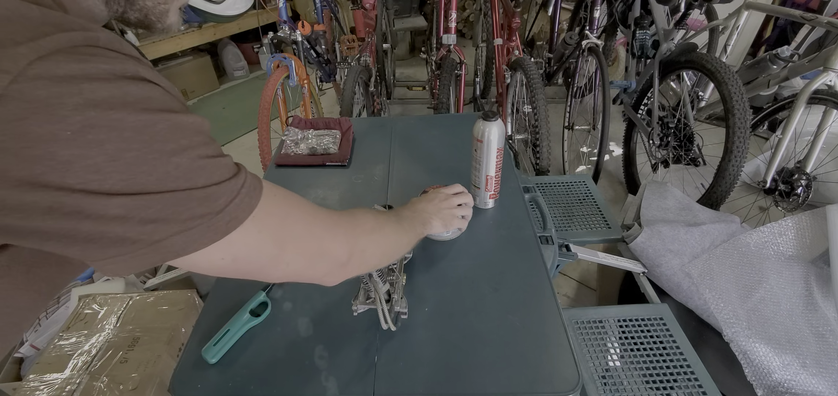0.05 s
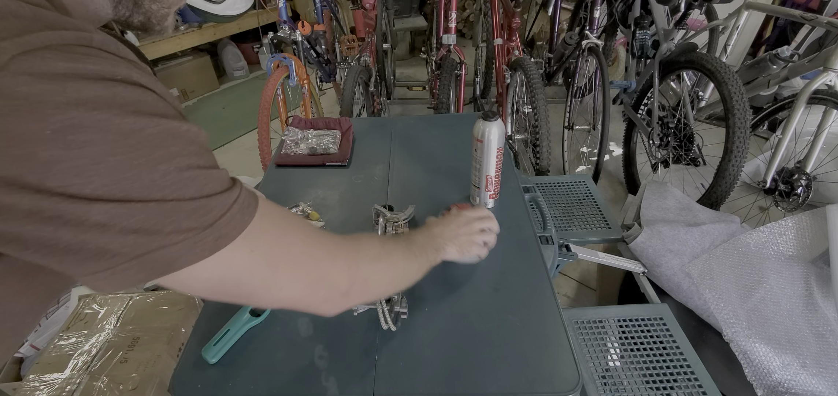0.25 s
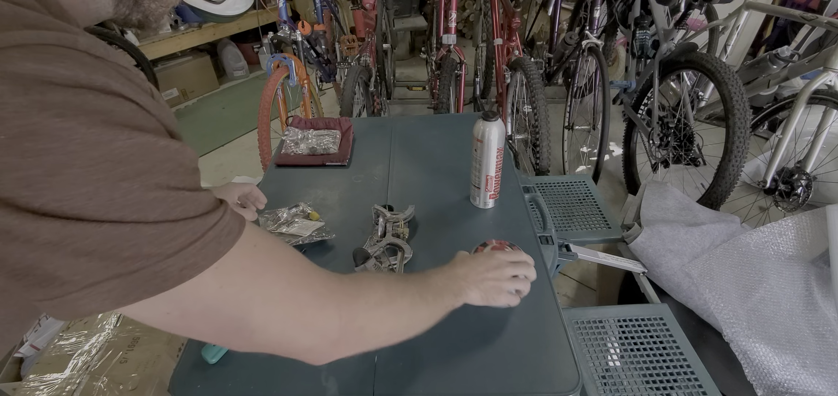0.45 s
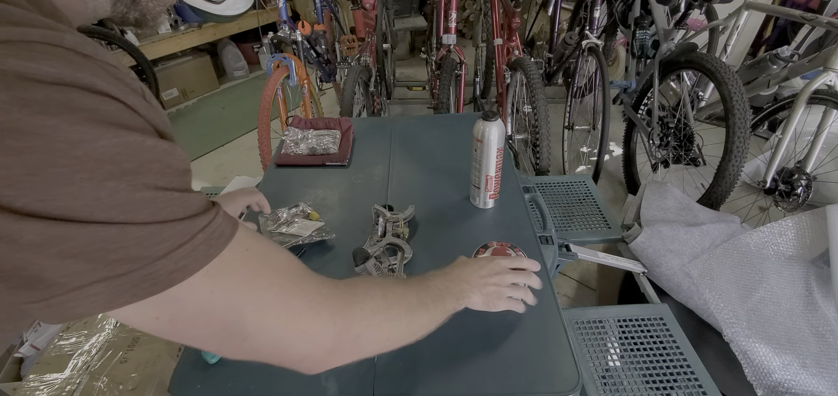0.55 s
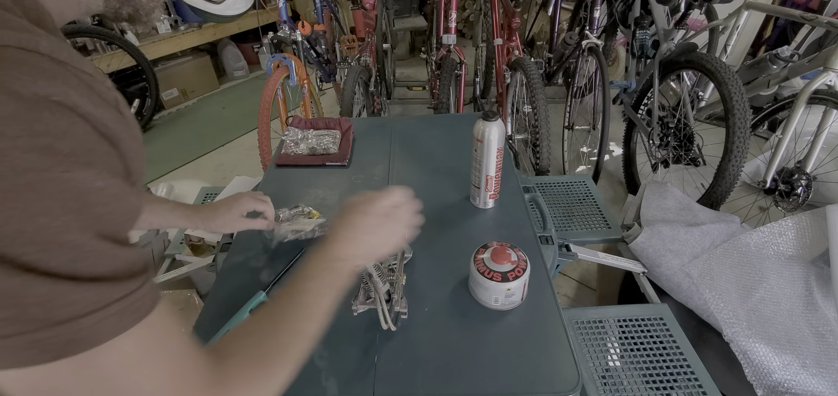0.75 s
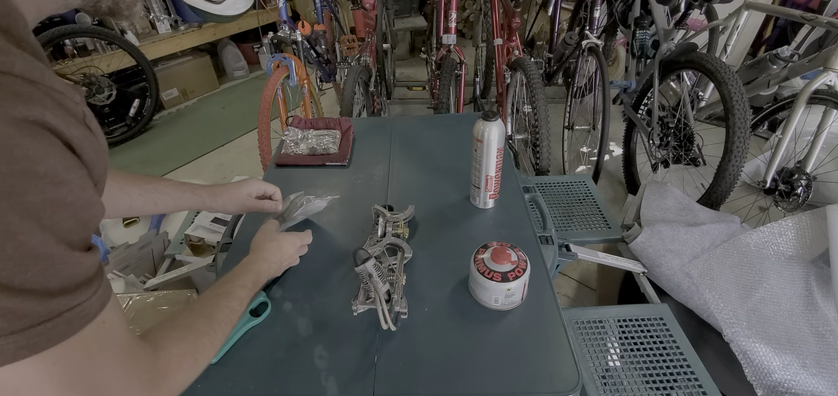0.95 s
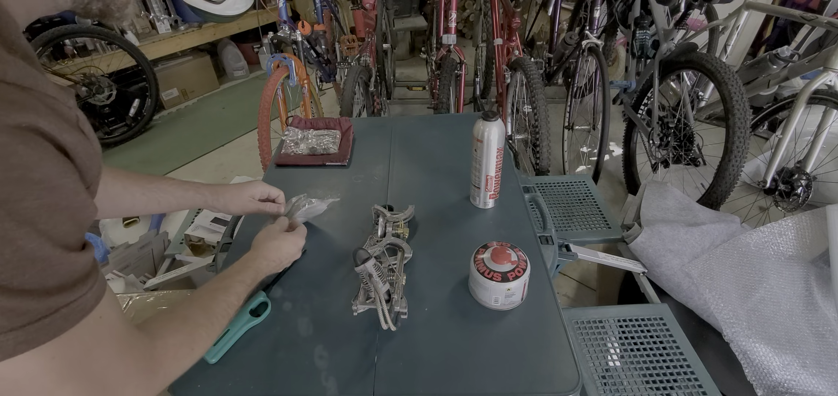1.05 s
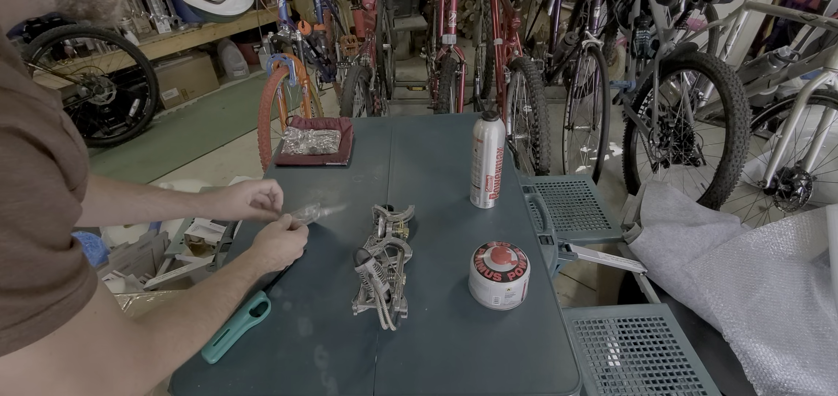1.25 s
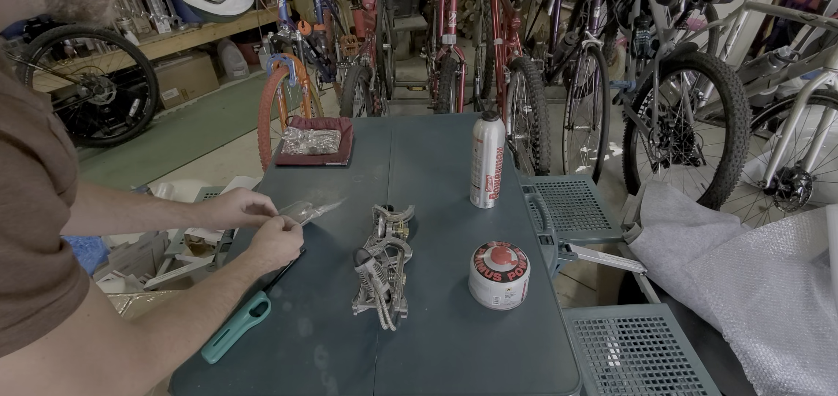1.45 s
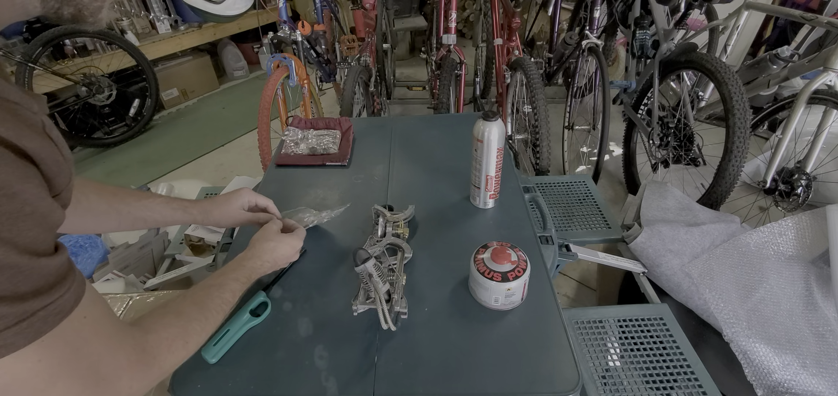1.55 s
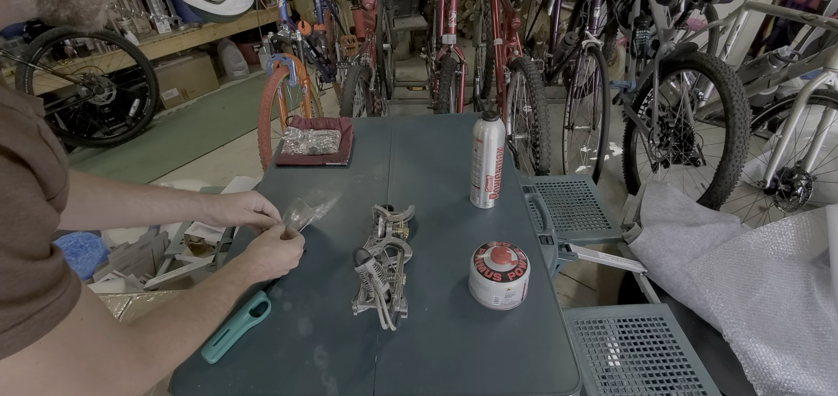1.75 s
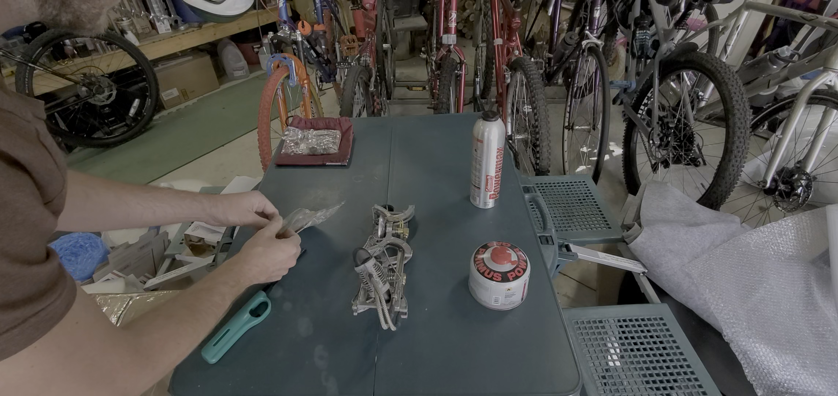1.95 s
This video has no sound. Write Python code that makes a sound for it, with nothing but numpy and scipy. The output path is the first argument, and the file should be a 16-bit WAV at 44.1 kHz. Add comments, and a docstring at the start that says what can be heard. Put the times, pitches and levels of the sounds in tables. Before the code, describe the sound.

A steel canister scrapes across a plastic table from about 0.1 to 0.6 seconds, rasping and catching while the top drones, loudest near 0.35. A dry tick sounds on the right at 0.7, and a hand rubs dully over the table around 0.9 to 1.1. From 0.7 to 2 seconds a small plastic bag crackles quietly, with a thin squeak near 1.3. A low workshop hum lies underneath.

```python
"""A workshop with a low hum, heard from a stereo microphone close to a plastic folding table.
First a steel fuel canister is pushed across it: the rim slips, rasps and catches, and the top drones.
Then a dry tick sounds on the right, and a hand rubs dully over the table and picks at a small
plastic bag, whose film crackles as it buckles and gives one longer squeak as it slides on itself."""
import sys
import numpy as np
from scipy import signal
from scipy.fft import rfft, irfft
from scipy.io import wavfile

SR = 44100
rng = np.random.default_rng(int(sys.argv[2]) if len(sys.argv) > 2 else 0)


def generate_wav(signal):
    """Clip the signal to [-1, 1] and save it as 16-bit WAV at the path in sys.argv[1]."""
    frames = np.transpose(np.atleast_2d(signal))
    scaled = np.clip(frames, -1, 1) * 32767
    pcm = np.round(scaled).astype(np.int16)
    wavfile.write(sys.argv[1], SR, pcm)


N = 88200
T = np.arange(N) / SR
BIN_HZ = np.arange(N + 1) * SR / (2 * N)

# modes of the plastic table top: pitch_hz, relative_db, t60_s
TABLE_MODES = [(109.8,-9.5,0.17),(138,-11.5,0.44),(167,-7.5,0.25),(215.5,-5.5,0.23),(255.4,-8.5,0.21),(341,0.5,0.26),(385,-2.5,0.19),(436.2,2,0.19),(486.5,2.5,0.13),(571.4,-5,0.3),(621,-4.5,0.17),(711.7,-1.5,0.31),(786,-8,.13),(998,-3.5,0.17)]


def from_db(db):
    """Decibels to gain."""
    return 10 ** (np.asarray(db) / 20)


def rms_one(x):
    """Scale to unit power."""
    return x / np.sqrt(np.mean(x ** 2) + 1e-20)


def in_time(rows):
    """Each column of a curve at every sample."""
    times, *columns = np.transpose(rows)
    return [np.interp(T, times, column) for column in columns]


def at_hz(points, hz):
    """Read a spectrum on a log-frequency axis."""
    frequencies, values = np.transpose(points)
    return np.interp(np.log(hz + 1e-3), np.log(frequencies), values)


def low_pass(x, hz, order=2):
    """Butterworth low-pass."""
    return signal.sosfilt(signal.butter(order, hz, fs=SR, output="sos"), x)


def colour(x, spectrum):
    """Causal filter of unit power gain with the given spectrum."""
    gain = rms_one(from_db(at_hz(spectrum, BIN_HZ)))
    cepstrum = irfft(np.log(gain))
    cepstrum[1:N] *= 2  # fold to minimum phase
    cepstrum[N + 1:] = 0
    return irfft(rfft(x, 2 * N) * np.exp(rfft(cepstrum)))[..., :N]


def spread(pair, left_lag_s=0):
    """Two unrelated signals become the microphone's left and right, alike in the bass."""
    # likeness of the two sides: frequency_hz, correlation
    likeness = [(60,.98),(140,.99),(290,.96),(500,.9),(1000,.8),(2000,.5),(5000,.28),(14000,.2)]
    alike = at_hz(likeness, BIN_HZ)
    mid, side = rfft(pair, 2 * N) * np.sqrt([1 + alike, 1 - alike]) / np.sqrt(2)
    delay = np.exp(-2j * np.pi * BIN_HZ * left_lag_s)
    return irfft([(mid + side) * delay, mid - side])[:, :N]


def panned(db):
    """Left and right gains; positive is to the left."""
    return from_db(np.array([[db], [-db]]) / 2)


def balanced(x, points):
    """A left-right balance that changes with frequency."""
    db = at_hz(points, BIN_HZ)
    return irfft(rfft(x, 2 * N) * from_db(np.array([db, -db]) / 2))[:, :N]


def noise():
    """Two unrelated white noises."""
    return rng.standard_normal((2, N))


def grains(per_s, spread_db):
    """Random clicks of uneven size, with separate strengths on two paths."""
    sizes = from_db(spread_db * np.minimum(rng.exponential(1, N), 4))
    return rms_one((rng.random(N) < per_s / SR) * sizes * noise())


def decay(start_s, fade_s):
    """A sudden start that dies away."""
    return (T >= start_s) * np.exp(-np.maximum(T - start_s, 0) / fade_s)


def resonance(x, hz, width_hz):
    """A resonance that keeps the power of white noise."""
    radius = np.exp(-np.pi * width_hz / SR)
    forward = np.sqrt((1 - radius ** 2) / 2) * np.array([1, 0, -1])
    feedback = [1, -2 * radius * np.cos(2 * np.pi * hz / SR), radius ** 2]
    return signal.lfilter(forward, feedback, x + 1e-18)


def body(force, modes):
    """A body's modes ring under a force."""
    hz, db, t60_s = np.transpose(modes)
    gains = from_db(db) / np.linalg.norm(from_db(db))
    widths_hz = np.log(1000) / (np.pi * t60_s)
    return sum(gain * resonance(force, pitch, width) for pitch, gain, width in zip(hz, gains, widths_hz))


def wavering(width_hz):
    """Slowly wandering complex amplitudes of a narrow line."""
    wander = low_pass(noise() + 1j * noise(), width_hz)
    return rms_one(wander.view(float)).view(complex)


def friction_tone(curve, width_hz, octave_db):
    """A rough, gliding stick-slip tone and its octave."""
    hz, db = in_time(curve)
    turn = np.exp(2j * np.pi * np.cumsum(hz) / SR)
    tone = wavering(width_hz) * turn + from_db(octave_db) * wavering(2 * width_hz) * turn ** 2
    return tone.real * from_db(db) * (T > curve[0][0]) * (T < curve[-1][0])


def room_hum():
    """A wavering hum over dull room tone, all around the microphone."""
    # lines of the hum: pitch_hz, width_hz, level_db
    lines = [(64.5,13,-53),(135.3,11,-57),(1285,10,-70.5)]
    # swell of all the lines together: time_s, gain_db
    swell = [(0,-7),(.25,8),(.55,-4),(.64,5),(.8,-3),(1.1,-0.5),(1.25,4.5),(1.33,9.5),(1.48,3),(1.7,2.5),(2,-3.5)]
    # spectrum of the room tone: frequency_hz, relative_db
    room_spectrum = [(25,-15),(45,0.5),(65,-6.5),(100,-3.5),(140,-7.5),(220,-14.5),(400,-20),(1200,-23),(3000,-33),(8000,-46.5),(16000,-39)]
    steady_share = .35
    hum = 0
    for hz, width_hz, db in lines:
        amplitude = np.sqrt(2 * steady_share) + np.sqrt(1 - steady_share) * wavering(width_hz)
        turn = np.exp(2j * np.pi * (hz * T + rng.random((2, 1))))
        hum += from_db(db) * (amplitude * turn).real
    room_tone = from_db(-52.5) * colour(noise(), room_spectrum)
    return spread(hum * from_db(in_time(swell)[0]) + room_tone)


def workshop_reverb(x, t60_s=.26, gap_s=.005):
    """The short, dull reverberation of a cluttered room."""
    tail = low_pass(noise() * from_db(-60 * T / t60_s) * (T > gap_s), hz=7560)
    return spread(signal.fftconvolve(x, rms_one(tail) / np.sqrt(N), axes=1)[:, :N])


def tick():
    """A single dry pulse with a bright edge, close to the microphone's right side."""
    pulse = decay(start_s=.6912, fade_s=.00056)
    edge = from_db(-8) * resonance(pulse, hz=4080, width_hz=700)
    return from_db(-29) * panned(db=-22.5) * low_pass(pulse + edge, hz=4920, order=8)


def table_boom(bottom_hz=100, top_hz=280):
    """The lowest modes of the table swell as weight shifts on it."""
    # swell of the boom: time_s, level_db
    swell = [(0,-89),(.1,-55),(.18,-39),(.308,-43),(.322,-28),(.37,-36),(.44,-38),(.475,-30.5),(.52,-36.5),(.6,-48),(.66,-54),(.71,-50),(.78,-61.5),(.87,-45),(.93,-38.5),(1.0,-49.5),(1.08,-46.5),(1.16,-52.5),(1.3,-62),(2,-62)]
    low_modes = [mode for mode in TABLE_MODES if mode[0] < top_hz]
    sway = rms_one(resonance(noise(), hz=144.6, width_hz=32))
    boom = sway + from_db(3) * rms_one(body(noise(), low_modes))
    band = signal.butter(3, [bottom_hz, top_hz], "band", fs=SR, output="sos")
    return spread(rms_one(signal.sosfilt(band, boom)) * from_db(in_time(swell)[0]))


def hand_bumps(pitch_hz=377.5, fade_s=.018, rise_s=.0031):
    """The soft hand lands on the table, each time with a brief, dull note."""
    # landings of the hand: start_s, level_db
    bumps = [(.106,-34.5),(1.108,-47.5),(1.454,-48),(1.71,-48.5)]
    out = 0
    for start_s, db in bumps:
        shape = decay(start_s, fade_s) - decay(start_s, rise_s)
        out += 2 * from_db(db) * shape * np.sin(2 * np.pi * pitch_hz * (T - start_s))
    return out


def hand():
    """Skin drags, judders and bumps on the table: soft slips, dull ringing."""
    # strength of the rubbing: time_s, level_db
    rubbing = [(.70,-67),(.80,-70),(.878,-43.5),(.893,-36),(.93,-36.5),(1.005,-33.5),(1.035,-45),(1.07,-51.5),(1.11,-43),(1.15,-63),(1.44,-72),(1.465,-50),(1.50,-56),(1.68,-64),(1.715,-48.5),(1.76,-70)]
    # spectrum of skin on plastic: frequency_hz, relative_db
    rub_spectrum = [(70,-27),(170,7.5),(290,-2),(380,9),(530,-3),(640,-5),(980,-1),(1200,-12),(2500,-22),(6000,-47)]
    # stick-slip of the skin: time_s, pitch_hz, level_db
    judder_curve = [(.83,490.3,-47),(.882,501.4,-47),(.897,503,-32),(.92,558.7,-46.5),(.965,546.2,-39.5),(.99,518.3,-30.5),(1.015,496,-42),(1.05,477,-75)]
    force = grains(per_s=900, spread_db=1) * from_db(in_time(rubbing)[0])
    rub = from_db(-1.5) * colour(force, rub_spectrum)
    ring = from_db(-6.5) * low_pass(body(force, TABLE_MODES), hz=553)
    judder = friction_tone(judder_curve, width_hz=20.7, octave_db=-19)
    return spread(rub + ring + judder) + hand_bumps()


def film_squeak(width_hz=183, chirp_hz=7670, chirp_half_s=.023):
    """Film slides over film in one squeak, and chirps faintly as the fingers shift their grip."""
    # glide of the squeak: time_s, pitch_hz, level_db
    glide = [(1.20,7550,-63),(1.235,7720,-53),(1.26,7300,-54),(1.31,7230,-44),(1.35,7070,-45),(1.41,7100,-53),(1.50,7000,-70)]
    # brief chirps: centre_s, level_db
    chirps = [(.232,-62),(1.078,-69),(1.167,-55)]
    squeak = friction_tone(glide, width_hz, octave_db=-12)
    swell = sum(from_db(db - 14 * ((T - centre_s) / chirp_half_s) ** 2) for centre_s, db in chirps)
    chirp_tone = (wavering(width_hz) * np.exp(2j * np.pi * chirp_hz * T)).real
    return squeak + swell * chirp_tone


def film_snaps(fade_s=.0012, rise_s=.00055, tail_s=.008, ring_q=2.5):
    """Each buckling patch of the bag gives a short crack, coloured by its own pitch."""
    # buckling patches: start_s, relative_db, left_minus_right_db, pitch_hz
    patches = [(0.726,-37,-5,9100),(0.759,-42,-5,6200),(0.7829,-39,-3,11000),(0.784,-38,5,1350),(0.786,-34.5,4,4240),(.818,-27.5,4.5,5430),(0.9008,-34.5,7.5,10600),(0.963,-38,4,7700),(1.0872,-41,-1,7600),(1.098,-55,4,12000),(1.110,-47,-7,13000),(1.13,-35.5,0,11100),(1.1691,-28,-2,13500),(1.173,-40,6,14100),(1.1874,-23,1,11800),(1.2097,-33,11,8160),(1.2218,-32,-1,11500),(1.258,-29.5,5,2900),(1.261,-37.5,-9,7050),(1.309,-38,0,11000),(1.368,-35,2,13600),(1.389,-38.5,15,11500),(1.4759,-31.5,2.5,12400),(1.5433,-42,-2,9100),(1.583,-34.5,6,12100),(1.633,-35,3,2920),(1.672,-33.5,4,4080),(1.687,-33,2,12300),(1.749,-33,3,9900),(1.770,-33.5,10,13900),(1.784,-38,-1,13000),(1.81,-37,1,11900),(1.8333,-27.5,4,10900),(1.851,-44,-9,13000),(1.949,-36.5,2,8800),(1.967,-38,2,12200),(1.977,-30.5,2,13000),(1.985,-31,3,13600)]
    out, crack = 0, noise()
    for start_s, db, pan_db, hz in patches:
        shape = decay(start_s, fade_s) - decay(start_s, rise_s) / 2
        tail = from_db(-18) * decay(start_s, tail_s)
        ring = from_db(-5) * resonance(crack, hz, hz / ring_q)
        out += from_db(db - 1.5) * panned(pan_db) * (shape + tail) * (crack + ring)
    return out


def bag(fade_in_s=.04):
    """Thin plastic near the microphone rustles, buckles in small creases, snaps and squeaks."""
    # strength of the handling: time_s, level_db
    picking = [(.68,-66),(.715,-56),(.735,-60),(.82,-53),(.93,-53.5),(1.0,-59.5),(1.075,-67),(1.095,-53.5),(1.15,-55.5),(1.185,-52.5),(1.3,-55.5),(1.39,-50.5),(1.44,-72),(1.48,-54.5),(1.53,-59),(1.59,-58.5),(1.65,-56),(1.68,-54),(1.735,-58.5),(1.775,-52),(1.84,-52.5),(1.89,-60),(1.942,-69),(1.955,-51),(2,-54.5)]
    # spectrum of the rustling film: frequency_hz, relative_db
    rustle_spectrum = [(300,0),(700,3.5),(1300,0.5),(2200,-2.5),(4000,-1),(7000,-12),(11000,-8),(16000,-16.5)]
    # spectrum of creases and snaps: frequency_hz, relative_db
    crackle_spectrum = [(500,1.5),(1300,5),(2300,-0.5),(4000,-2),(6000,0),(9000,-2.5),(12000,-1),(16000,2.5)]
    fade_in = np.clip((T - picking[0][0]) / fade_in_s, 0, 1)
    handling = from_db(in_time(picking)[0]) * fade_in
    rustle = from_db(2) * colour(noise() * handling, rustle_spectrum)
    creases = from_db(.5) * colour(grains(per_s=760, spread_db=4) * handling, crackle_spectrum)
    film = spread(rustle + creases + film_squeak(), left_lag_s=-.00012)
    snaps = colour(film_snaps(), crackle_spectrum)
    return (film + snaps) * panned(db=-1.3)


def canister():
    """The rim slips in tiny jerks that shake the table and rasp in the can; now and then it catches."""
    # course of the push: time_s, drone_db, rasp_db
    push = [(0,-73,-75),(.09,-56.5,-83),(.114,-45,-56),(.148,-47.5,-59),(.2,-34,-57),(.225,-46.5,-56),(.25,-31,-49),(.275,-25.5,-36.5),(.315,-25,-29),(.36,-24,-31),(.41,-22.5,-32.5),(.44,-28,-33.5),(.49,-29,-39.5),(.525,-38.5,-45.5),(.565,-55.5,-54.5),(.62,-57,-63.5),(.68,-69,-64),(.8,-83,-99)]
    # the rim catches and knocks the table: start_s, level_db
    catches = [(0.198,-34.5),(0.233,-32),(0.247,-28.5),(0.276,-28),(0.321,-19.5),(0.3267,-17),(0.399,-18.5),(0.411,-32)]
    # spectrum of the table's drone: frequency_hz, relative_db
    drone_spectrum = [(60,-24),(100,-37),(200,-14),(290,-10.5),(450,3.5),(750,0),(900,0.5),(1100,-3.5),(1500,-5),(2200,-14),(4000,-37)]
    # spectrum of the knocks: frequency_hz, relative_db
    knock_spectrum = [(70,-14),(250,-9.5),(450,0.5),(800,1.5),(1300,-5),(2000,-14.5),(4000,-40.5)]
    # spectrum of the rim's rasp: frequency_hz, relative_db
    rasp_spectrum = [(900,-31.5),(1600,5),(2800,4.5),(3700,1),(4600,-10),(6000,-15),(8000,-12),(11000,-13.5),(16000,-12)]
    # the rasp sits a little to the microphone's right: frequency_hz, left_minus_right_db
    rasp_balance = [(1300,-3.5),(4400,0),(8000,-1.5),(15000,-4)]
    # modes of the steel shell: pitch_hz, relative_db, t60_s
    steel_modes = [(1052,0,.25),(1289,1,.3),(1490,-2,.08),(1634,0,.25),(2340,-7,.15),(2480,-6,.1),(2843,-5,.25),(3290,-8,.15)]
    drone_db, rasp_db = in_time(push)
    slips = grains(per_s=2500, spread_db=2)
    knocks = noise() * sum(from_db(db) * decay(start_s, fade_s=.0061) for start_s, db in catches)
    force = slips * from_db(drone_db - 3)
    drone = colour(force, drone_spectrum) + colour(knocks, knock_spectrum)
    table_ring = body(force + from_db(-11) * knocks, TABLE_MODES)
    grit = rms_one(slips + 2.4 * noise()) * from_db(rasp_db)
    steel_ring = from_db(-3) * body(grit, steel_modes)
    rasp = spread(from_db(2.5) * colour(grit, rasp_spectrum), left_lag_s=.00018)
    return spread(drone + table_ring + steel_ring) + balanced(rasp, rasp_balance)


def scene():
    """Canister, hand and bag close by with a little reverberation, plus boom, tick and room hum."""
    near = canister() + hand() + bag()
    return near + from_db(-14.5) * workshop_reverb(near) + table_boom() + tick() + room_hum()


def record(dry, low_cut_hz=42, top_hz=16000):
    """The microphone's signal has its deepest bass rolled off and its top cut steeply."""
    low_cut = signal.butter(3, low_cut_hz, "high", fs=SR, output="sos")
    high_cut = signal.ellip(10, .2, 90, top_hz, fs=SR, output="sos")
    return signal.sosfilt(high_cut, signal.sosfilt(low_cut, dry))


dry = scene()
out = record(dry)
generate_wav(out)
```